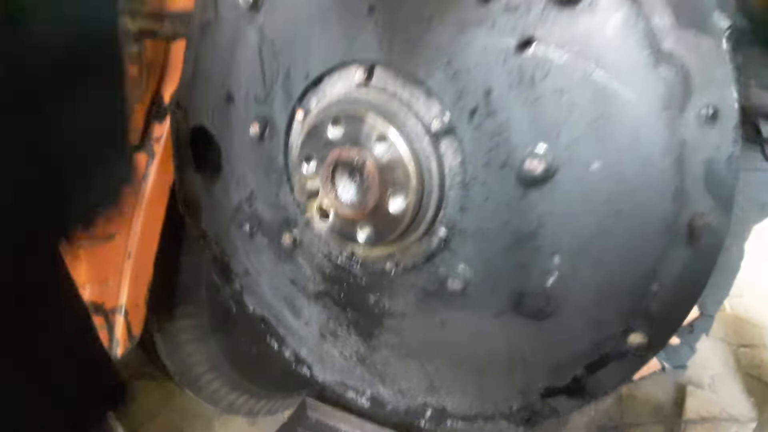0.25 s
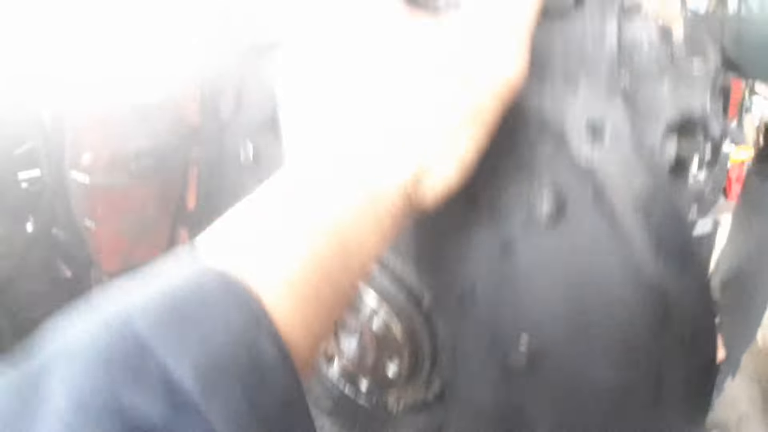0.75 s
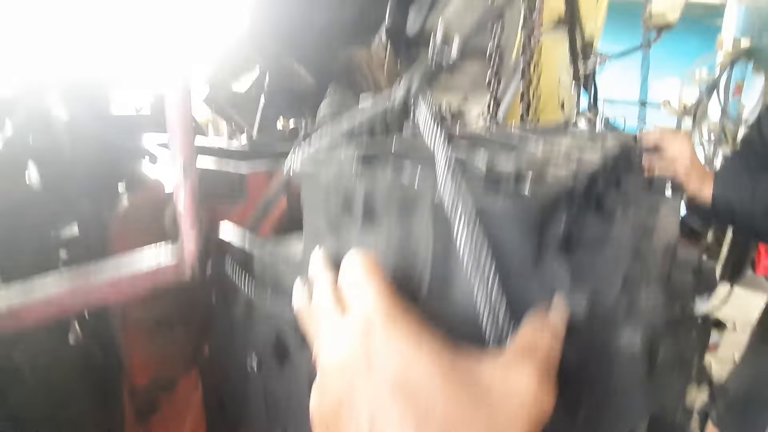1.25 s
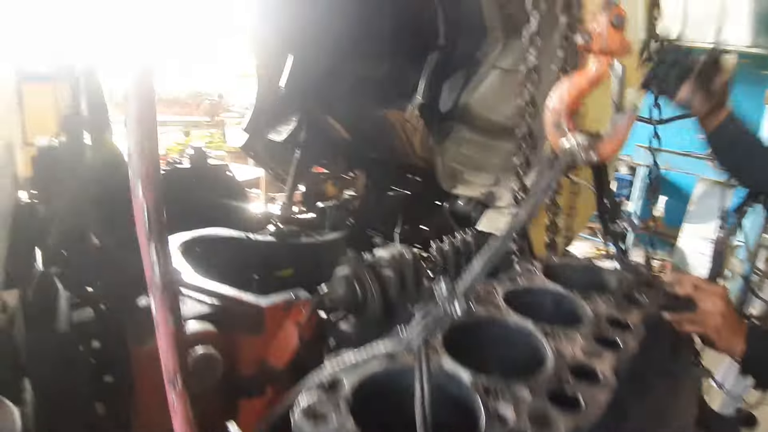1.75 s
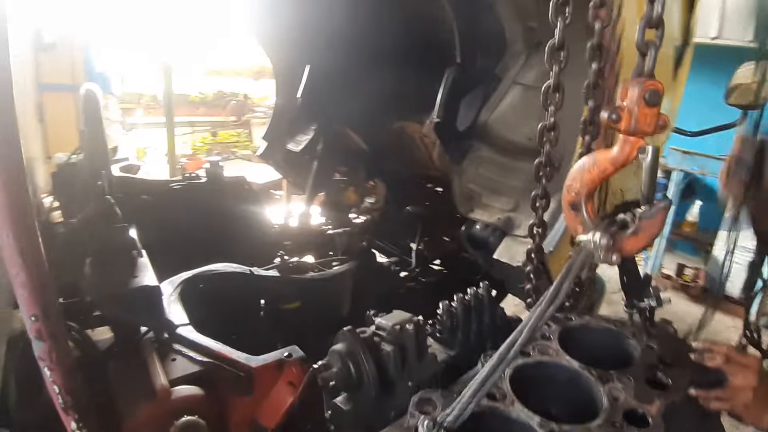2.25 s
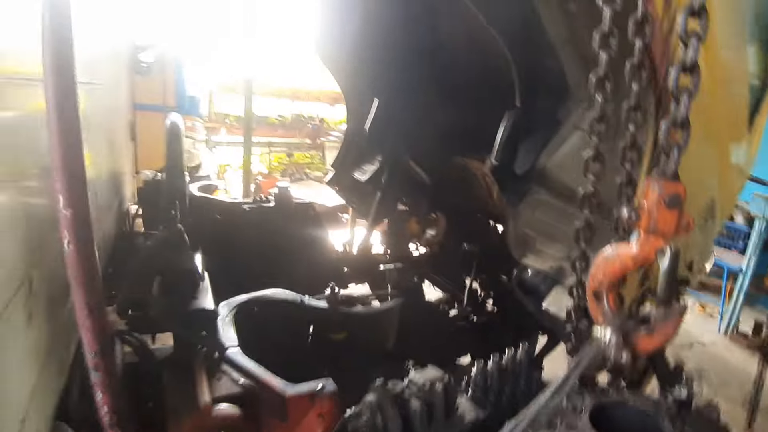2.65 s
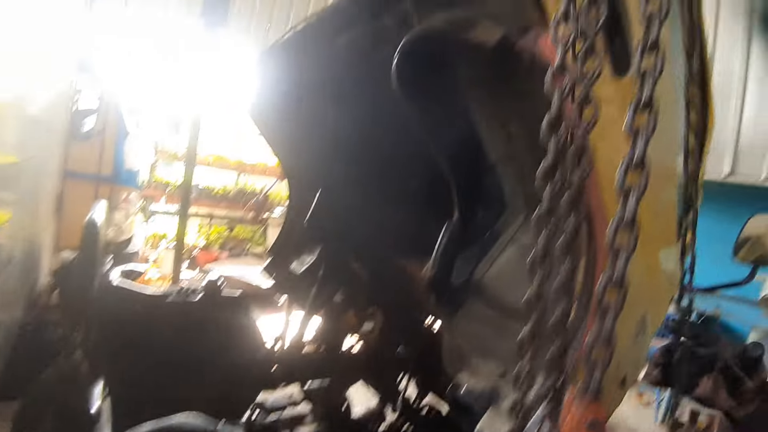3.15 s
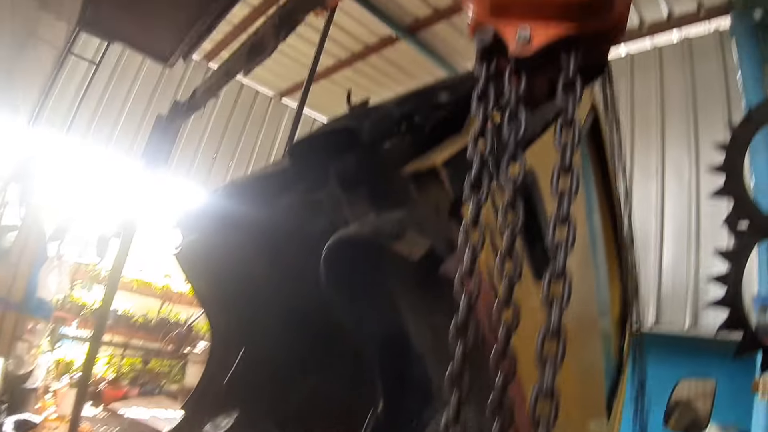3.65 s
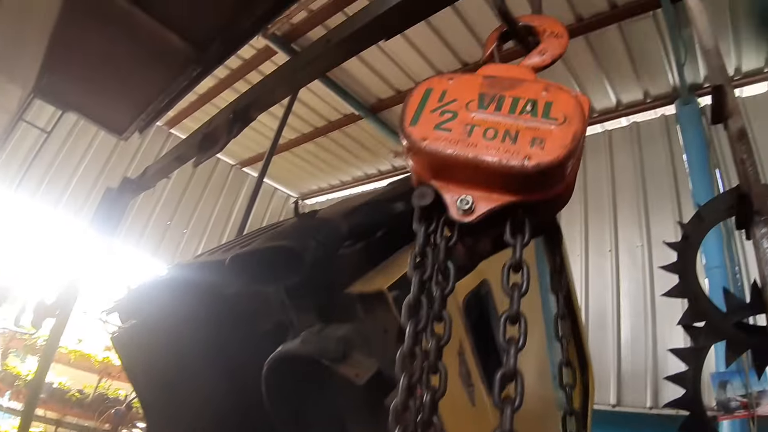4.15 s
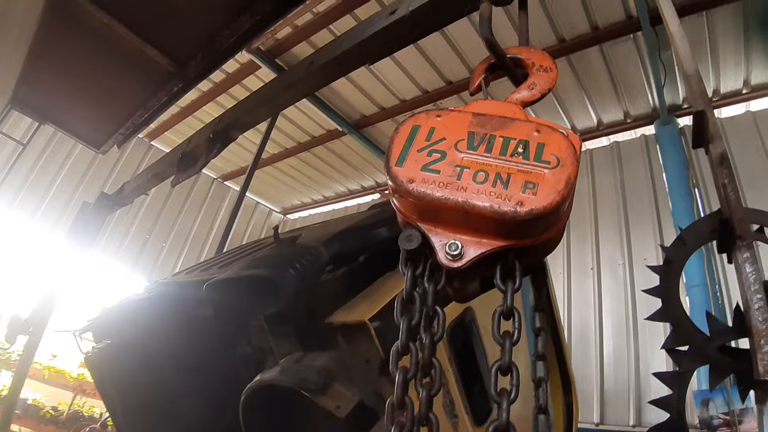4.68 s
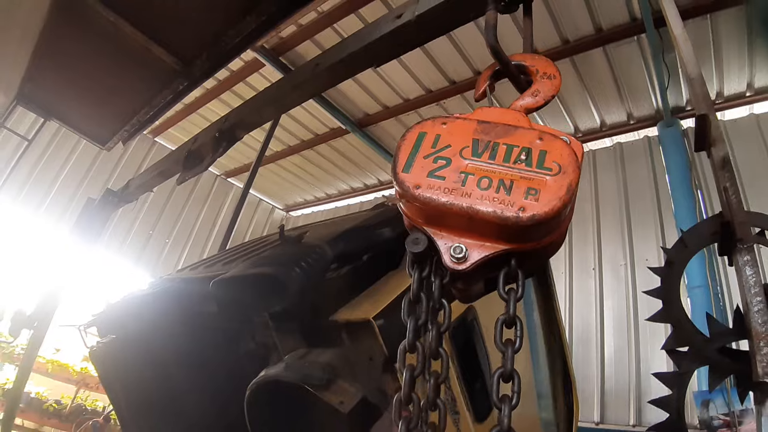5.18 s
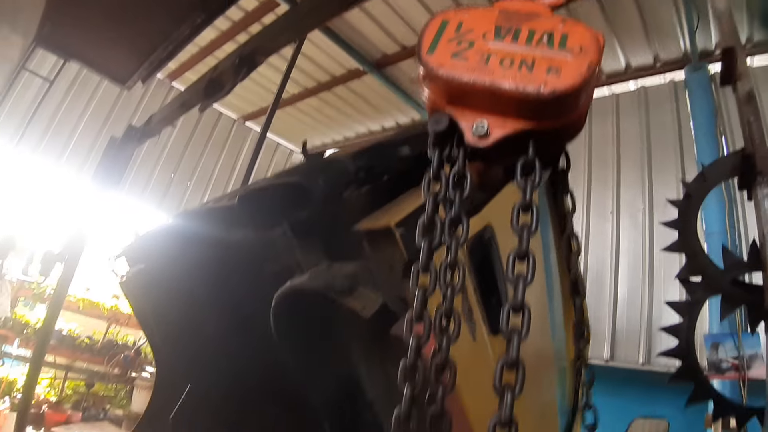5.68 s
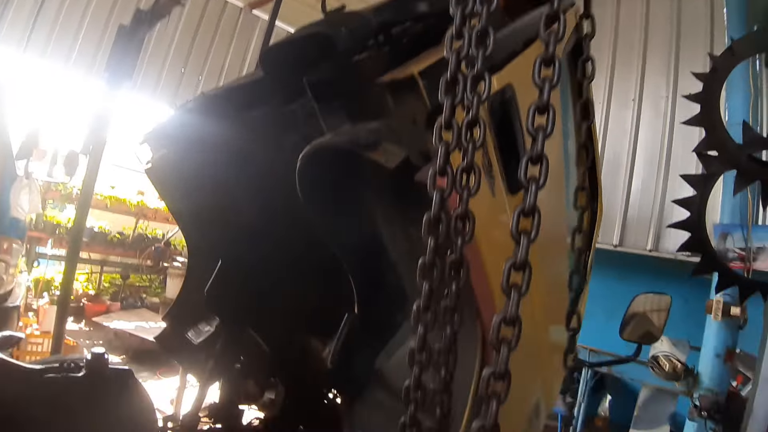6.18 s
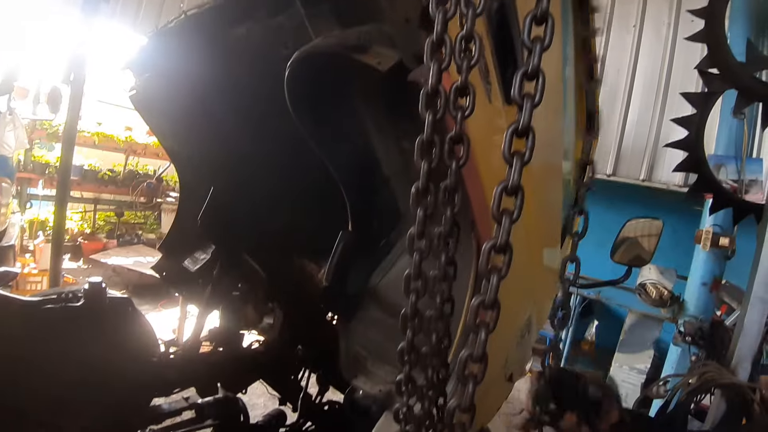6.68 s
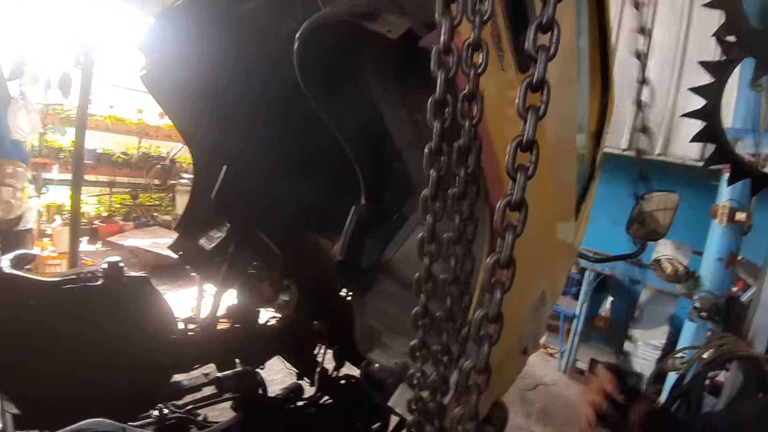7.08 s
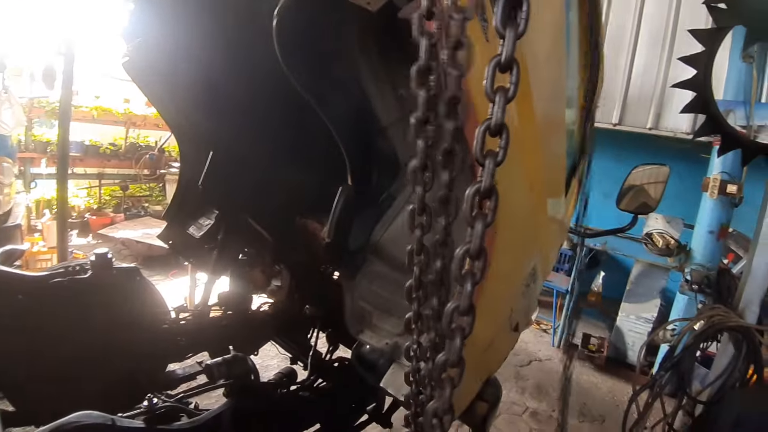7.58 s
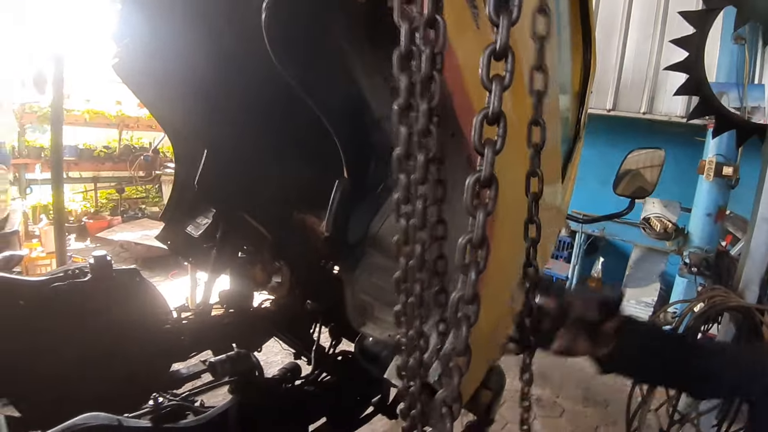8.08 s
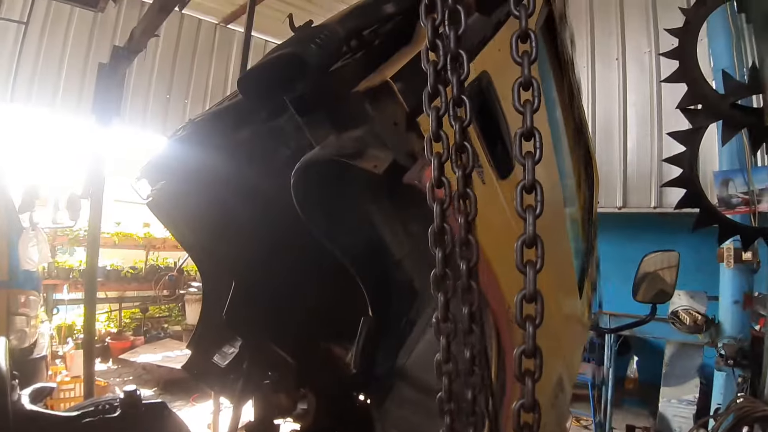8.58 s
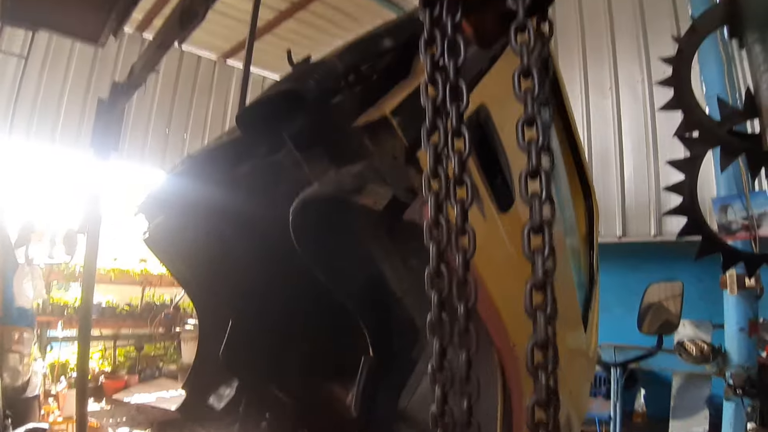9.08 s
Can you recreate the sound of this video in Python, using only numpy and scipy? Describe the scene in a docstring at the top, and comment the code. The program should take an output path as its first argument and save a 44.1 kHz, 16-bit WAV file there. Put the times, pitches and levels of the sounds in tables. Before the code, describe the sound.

A pull already under way fades out, then six more bursts of chain clatter follow with uneven pauses. Fast metallic links, sharp ratchet clicks and boxy cover knocks crowd together, sometimes thickening into a hoarse slap. Loose links tinkle in the gaps. Close stereo pickup favours the right; a bright, short metallic room echo and quiet shop rumble surround it.

```python
"""A sheet-metal workshop, where a hand chain hoist is worked in seven pulls, close by and to the right.
In each pull the wheel speeds up and slows down. Links clink, the pawl ticks, the housing knocks and the
slack chain rattles: each contact is a handful of fading sine waves plus a short burst of noise.
The cover clatters four times; loose links jingle, dry scuffs and two dull bumps are heard.
The room answers with fading noise, and the shop rumbles faintly as coloured noise."""
import sys
import numpy as np
from scipy import signal
from scipy.fft import rfft, irfft, next_fast_len
from scipy.io import wavfile
from scipy.ndimage import map_coordinates

SR = 44100
rng = np.random.default_rng(int(sys.argv[2]) if len(sys.argv) > 2 else 0)


def pcm_store(signal):
    """Save signal as 16-bit PCM."""
    levels = np.round(np.clip(np.atleast_2d(signal), -1, 1) * 32767)
    wavfile.write(sys.argv[1], SR, levels.astype(np.int16).T)


N = 411453  # length in samples


def amp(db):
    """Decibels to gain."""
    return 10 ** (np.asarray(db) / 20)


def unit(x):
    """Scale x to an rms of 1."""
    return x / np.sqrt(np.mean(x ** 2) + 1e-20)


def along(points, hz):
    """Read (pitch_hz, value) points at any pitch, on a log axis."""
    point_hz, values = np.transpose(points)
    return np.interp(np.log(hz + 1), np.log(point_hz + 1), values)


def curve(rows):
    """Turn (time_s, value) rows into one value per sample."""
    return np.interp(np.arange(N) / SR, *np.transpose(rows))


def filtered(x, response):
    """Multiply the spectrum of x by a gain that depends on frequency."""
    size = next_fast_len(N + SR // 2)
    spectrum = rfft(x, size) * response(np.fft.rfftfreq(size, 1 / SR))
    return irfft(spectrum, size)[..., :N]


def noise(colour):
    """Coloured noise of rms 1."""
    white = rng.standard_normal(N)
    return unit(filtered(white, lambda hz: amp(along(colour, hz))))


def decaying(times, sizes, t60, hz=0):
    """A damped oscillator kicked at the given times; at 0 Hz it is a plain fading level."""
    kicks = np.full(N, 1e-20, complex)
    places = np.clip(np.round(np.asarray(times) * SR).astype(int), 0, N - 1)
    np.add.at(kicks, places, sizes)
    pole = np.exp((2j * np.pi * hz - np.log(1000) / t60) / SR)
    return signal.lfilter([1], [1, -pole], kicks)


def ring(times, db, modes, scatter_db, detune, attack):
    """Each blow lands on another spot: it shares its energy among the modes anew, at slightly new pitches."""
    hz, level, t60 = np.transpose(modes)
    strength, pitch, phase = rng.standard_normal((len(times), 3, len(modes))).transpose(1, 0, 2)
    # Soft blows reach the high modes less.
    dulling_db = 0.072 * np.outer(db - db.max(), np.log2(hz / hz.mean()))
    sizes = amp(level + dulling_db + scatter_db * strength)
    sizes *= (amp(db) / np.linalg.norm(sizes, axis=1))[:, None]
    speed = 2 * np.pi * hz * (1 + detune * pitch)
    sizes, speed, phase = np.float32([sizes, speed, 2 * np.pi * phase])[..., None]
    t = np.arange(SR // 10, dtype=np.float32) / SR  # a ring lasts 0.1 s at most
    rings = np.zeros((len(times), len(t)), np.float32)
    for k, life in enumerate(t60):
        u = t[t < life]
        fade = np.float32(np.exp(-np.log(1000) * u / life))
        rings[:, :len(u)] += sizes[:, k] * np.sin(speed[:, k] * u + phase[:, k]) * fade
    rings *= 1 - np.exp(-t / attack)
    where = np.round(np.maximum(times, 0) * SR).astype(int)[:, None] + np.arange(len(t))
    return np.bincount(where.ravel(), rings.ravel(), N)[:N]


def crack(times, db, colour, t60, attack):
    """A short burst of noise at every contact, building up as the parts chatter."""
    fading = decaying(times, amp(db) ** 2, t60 / 2).real
    not_yet_built = decaying(times, amp(db) ** 2, attack * np.log(1000)).real
    return np.sqrt(np.abs(fading - not_yet_built)) * noise(colour)


def blows(*groups):
    """Join groups of ((times, levels), gain dB) into one list, leaving out any before time 0."""
    times = np.concatenate([group[0] for group, _ in groups])
    db = np.concatenate([group[1] + gain for group, gain in groups])
    return times[times > 0], db[times > 0]


# Pulls on the hand chain; the first is already under way. Levels are relative, before each layer's own gain.
# A lean makes the late part of a pull louder (+) or softer (-).
# Columns: start_s, fastest_s, end_s, top_speed_links_per_s, clinks_db, knocks_db, pawl_db, slack_chain_db,
# chain_lean_db_per_s, knock_lean_db_per_s
PULLS = [(-.453, -0.151, .32, 33, -9.5, -22.5, -14.5, -14, -32.5, -12.5),
         (0.746, 1.139, 1.575, 43.34, -16, -28.5, -20, -13.5, -5, 13.5),
         (2.123, 2.57, 2.832, 46.59, -13, -19.5, -15, -10.5, -10.5, -3.5),
         (3.431, 3.895, 4.088, 44.78, -11, -20.5, -8.5, -19, -12.5, -18),
         (4.932, 5.288, 5.623, 48.21, -13.5, -19.5, -7.5, -28.5, 1, -8.5),
         (7.116, 7.489, 7.88, 47.69, -16, -23, -17, -12, -13.5, -12),
         (8.261, 8.31, 8.877, 51.87, -6.5, -21.5, -18, -12.5, -19, -8.5)]
LINK_SCATTER_DB = 2.73  # no two links land alike


def passing(lag, grows_db, scatter_db, columns):
    """One contact (s, dB) per link: in each pull the wheel speeds up and slows down along quarter sines.
    Lag is a share of a link's travel, grows_db the gain per tenfold speed; columns picks level and lean."""
    times, db = [], []
    for pull in np.array(PULLS):
        start, fastest, end, top = pull[:4]
        level, lean = pull[list(columns)]
        t = np.linspace(start, end, num=1000)
        pace = np.sin(np.pi * np.interp(t, [start, fastest, end], [0, .5, 1]))
        travel = np.cumsum(top * pace) * (t[1] - t[0])  # in links
        at = np.interp(np.arange(.5 + lag, travel[-1]), travel, t)
        landing = rng.standard_normal(64)[:len(at)]
        # Faster links hit harder.
        speed_db = grows_db * np.log10(np.interp(at, t, pace) + 1e-6)
        times.append(at)
        db.append(level + lean * (at - fastest) + speed_db + scatter_db * landing)
    return np.concatenate(times), np.concatenate(db)


# Single links that snap taut in a pull, or swing against the hoist between pulls; also used by the
# chain and the housing. Levels are relative. Columns: time_s, clink_db, knock_db
SINGLE_LINKS = [(0.7918, -24.5, -46), (0.8406, -18.5, -38), (1.1556, -13, -22), (1.204, -18.5, -25),
                (1.2525, -14.5, -21.5), (1.432, -20.5, -43.5), (2.1734, -26.5, -46), (2.2143, -16.5, -54),
                (2.335, -16.5, -21.5), (2.3644, -13.5, -21), (2.7205, -8, -21.5), (3.4519, -33.5, -47.5),
                (3.4986, -22, -29), (3.5485, -15, -33), (3.6148, -6, -20.5), (3.683, -6.5, -15.5),
                (3.998, -8.5, -19), (4.087, -19.5, -22.5), (4.508, -38.5, -43), (4.77, -46, -42.5),
                (4.8447, -28.5, -37), (4.9634, -33, -47.5), (4.986, -35, -31.5), (5.0495, -13.5, -21.5),
                (5.12, -12.5, -16.5), (5.1455, -12.5, -19), (5.4944, -15, -34.5), (5.542, -14, -20.5),
                (5.62, -22.5, -29.5), (5.847, -31, -43), (5.8915, -30.5, -48), (5.975, -40, -45),
                (6.783, -44.5, -65.5), (7.1345, -23.5, -45.5), (7.1831, -18, -47.5), (7.2778, -10.5, -19.5),
                (7.3372, -13.5, -19), (7.3617, -10, -17.5), (7.703, -11, -39.5), (7.7156, -20.5, -19),
                (8.1462, -31.5, -47), (8.2893, -12, -24.5), (8.3039, -9.5, -22), (8.507, -6.5, -19),
                (8.6729, -20.5, -23), (8.6944, -12.5, -37.5), (8.7363, -18.5, -42.5), (8.773, -22.5, -27.5),
                (9.2913, -42, -45.5)]


def ordinary(links):
    """The passing links (s, dB), less those within 13 ms of a single link."""
    times, db = links
    apart = np.abs(times[:, None] - np.transpose(SINGLE_LINKS)[0]).min(axis=1) > .013
    return times[apart], db[apart]


def grazes(links):
    """A link grazes the wheel up to 5 ms before it seats, 15 dB softer."""
    times, db = links
    return times - 0.005 * rng.uniform(.5, 1, 256)[:len(times)], db - 15


def rattle(links, count):
    """Each passing link shakes the chain: small contacts (s, dB) follow it, ever rarer and fainter."""
    settle_s, settle_db_per_s = 0.34, 96.5
    times, db = links
    chance = rng.random((256, count))[:len(times)]
    delay = settle_s * ((np.arange(count) + chance) / count) ** 2
    return (times[:, None] + delay).ravel(), (db[:, None] - settle_db_per_s * delay).ravel()


def wheel_ring(times, db):
    """Every chain contact feeds the hand wheel's one long note, which rings on after the links."""
    kicks = amp(db - 34) * np.exp(2j * np.pi * rng.random(len(times)))
    return decaying(times, kicks, t60=0.76, hz=4290).imag


# Ringing modes of the chain and wheel. Columns: pitch_hz, relative_level_db, t60_s
STEEL = [(3894, -4.5, 0.031), (4162, -4, 0.038), (4264, -1.5, 0.044), (4834, -10, 0.035), (5158, 2, 0.031),
         (6136, -2, 0.026), (7290, -17, 0.058), (8320, -12.5, 0.041), (8690, -13, 0.069), (9000, -3, 0.026),
         (10720, -8, 0.022), (12970, -15.5, 0.044), (15200, -32, .04)]
# Colour of the noise when steel parts touch, also used by the pawl. Columns: pitch_hz, relative_level_db
STEEL_CRACK = [(150, -31), (1500, -10), (2800, -13.5), (3450, -9.5), (3950, 9.5), (4700, 1), (5700, -3),
               (6900, -10.5), (8800, -2), (9800, -13), (12000, -8.5), (13300, -18), (14000, -12.5),
               (16000, -23.5)]


def chain():
    """Links clink onto the wheel and off it, with a finer rattle from the slack chain between them."""
    single_db, seating_db, leaving_db, graze_db, rattle_db = 0.5, 1.5, -3, -3.5, -6
    clink_grows_db, rattle_grows_db = 36, 23.5  # per tenfold speed
    leave_lag = 0.52  # share of a link's travel until another link leaves the wheel
    single = np.transpose(SINGLE_LINKS)[:2]
    seating = ordinary(passing(0, clink_grows_db, LINK_SCATTER_DB, columns=(4, 8)))
    leaving = ordinary(passing(leave_lag, clink_grows_db, LINK_SCATTER_DB, columns=(4, 8)))
    slack = rattle(passing(0, rattle_grows_db, LINK_SCATTER_DB, columns=(7, 8)), count=12)
    times, db = blows((single, single_db), (seating, seating_db), (leaving, leaving_db),
                      (grazes(single), graze_db), (slack, rattle_db))
    crack_db = db + 0.084 * (db - db.max())  # gentle touches ring purer than hard ones
    links = amp(6) * ring(times, db, STEEL, scatter_db=5.5, detune=0.0099, attack=0.0017)
    contact = crack(times, crack_db, STEEL_CRACK, t60=0.033, attack=0.0006)
    return links + contact + wheel_ring(times, db)


# Ringing modes of the pawl. Columns: pitch_hz, relative_level_db, t60_s
PAWL = [(4267, -6.5, 0.05), (5108, -3, 0.034), (6130, 0.5, 0.023), (8040, -3, 0.016), (8970, -2, 0.023),
        (10730, -1, 0.027), (13050, -20.5, 0.027)]


def pawl():
    """The sprung pawl drops once per link and rings in its own clear modes."""
    tick_lag = 0.56  # share of a link's travel after it seats
    ticks = passing(tick_lag, grows_db=27, scatter_db=0.5, columns=(6, 8))
    times, db = blows((ticks, 0))
    ringing = amp(5.0) * ring(times, db, PAWL, scatter_db=6, detune=0.0067, attack=0.0006)
    return ringing + amp(-5.5) * crack(times, db, STEEL_CRACK, t60=.018, attack=.0002)


# Ringing modes of the housing. Columns: pitch_hz, relative_level_db, t60_s
HOUSING = [(643.6, -10, 0.095), (695, -2.5, 0.058), (789, -0.5, 0.051), (855.7, 1, 0.05),
           (927, -2.5, 0.041), (1021, -8, 0.022), (1250, -4.5, 0.03), (1440, -5, 0.037),
           (1504, -0.5, 0.072), (1670, -23, 0.028), (1860, -15.5, 0.044), (1915, -3, 0.099),
           (2050, -8, 0.05), (2205, -6, 0.12), (2434, -9, 0.076), (4010, -11, 0.066)]
# Colour of the noise when the housing is knocked. Columns: pitch_hz, relative_level_db
HOUSING_CRACK = [(30, -38), (150, -11.5), (330, -20), (520, -31), (720, -5), (1150, -7), (1500, -6),
                 (2400, -5), (2800, -13), (6000, -17)]


def housing():
    """Links knock on the wheel, the shaken chain clatters after them, and the hollow cover answers."""
    single_db, seating_db, graze_db, clatter_db = 0.5, -1.0, -0.5, -7.5
    knock_grows_db, clatter_grows_db = 31.5, 20.5  # per tenfold speed
    single = np.transpose(SINGLE_LINKS)[[0, 2]]
    seating = ordinary(passing(0, knock_grows_db, LINK_SCATTER_DB, columns=(5, 9)))
    clatter = rattle(passing(0, clatter_grows_db, LINK_SCATTER_DB, columns=(5, 9)), count=8)
    times, db = blows((single, single_db), (seating, seating_db), (grazes(single), graze_db),
                      (clatter, clatter_db))
    hollow = amp(6) * ring(times, db, HOUSING, scatter_db=3.5, detune=0.005, attack=0.0016)
    return hollow + amp(1.0) * crack(times, db, HOUSING_CRACK, t60=0.059, attack=0.0026)


# Near full speed the chain slaps the cover's sheet. Columns: middle_s, half_length_s, relative_level_db
SLAPS = [(1.193, 0.078, -28), (5.333, 0.05, -13), (7.424, 0.04, -22), (8.434, 0.052, -16.5)]


def slaps():
    """Twelve quick hits per slap make a thick, hoarse clatter in the cover's resonances."""
    place = np.linspace(-1, 1, num=12)
    times = np.concatenate([middle + half * place for middle, half, _ in SLAPS])
    times = times + 0.0025 * rng.standard_normal(len(times))
    db = np.concatenate([level - 8 * place ** 2 for _, _, level in SLAPS])
    # Columns: pitch_hz, relative_level_db, t60_s
    cover = [(857, 3, .03), (1340, 1, 0.033), (1410, 2.5, 0.0072), (1700, 1.0, 0.036), (2080, -3, .03)]
    return amp(9.5) * ring(times, db, cover, scatter_db=3, detune=.05, attack=.001)


# Loose links touching. Columns: time_s, relative_level_db
JINGLES = [(0.2179, -25.5), (1.587, -24), (1.827, -33), (2.8807, -23), (2.9416, -29), (4.2281, -28.5),
           (5.641, -26.5), (5.674, -30), (7.8758, -29.5), (8.8578, -32)]
# Ringing modes of a loose link. Columns: pitch_hz, relative_level_db, t60_s
LOOSE = [(4440, -3, 0.079), (7460, -10, 0.055), (7900, 1.5, 0.052), (8400, -4, 0.048), (9100, 0.5, 0.052),
         (10600, -3, 0.043), (11750, -14, 0.051), (12900, -36, .04)]


def loose_links():
    """Unloaded links ring higher and fainter, with a little scuffing noise."""
    times, db = np.transpose(JINGLES)
    links = ring(times, db, LOOSE, scatter_db=2.5, detune=.02, attack=.001)
    contact = crack(times, db, SCUFF_COLOUR, t60=0.19, attack=.001)
    return amp(1.0) * links + amp(-8.5) * contact


# The microphone's aim changes how much of the top octave it hears. Columns: time_s, gain_db
FACING = [(0, 0.5), (1.2, 2.5), (2.6, -1), (3.8, -1.5), (5.3, -3), (7.4, -1), (8.4, 0.5), (9.3, -7.5)]


def facing(x):
    """The microphone's aim raises or lowers the treble above about 11 kHz."""
    top = filtered(x, lambda hz: 1 / (1 + (11000 / (hz + 1)) ** 12))
    return x + (amp(curve(FACING)) - 1) * top


# Small dry scuffs of handling. Columns: time_s, level_db
SCUFFS = [(0.401, -42), (0.4617, -38), (0.552, -37.5), (3.1266, -48), (3.2134, -42.5), (4.4525, -45),
          (6.352, -41.5), (6.559, -44.5), (6.638, -50.5), (8.0423, -48), (9.0078, -38)]
# Colour of the scuffing noise, also used by the loose links. Columns: pitch_hz, relative_level_db
SCUFF_COLOUR = [(500, -6.5), (2500, -4.5), (6000, -4.5), (11000, -1.5), (16000, -11.5)]


def scuffs():
    """Dry little rubs with no pitch: noise that starts at once and fades."""
    times, db = np.transpose(SCUFFS)
    return decaying(times, amp(db), t60=0.09).real * noise(SCUFF_COLOUR)


# Two dull bumps. Columns: time_s, level_db, pitch_hz, t60_s
BUMPS = [(3.879, -20.5, 85.6, 0.076), (8.111, -32, 204.5, .05)]


def bumps():
    """Each bump is a low, quickly damped tone with a soft click of noise."""
    push = sum(decaying([s], amp(db), t60, hz).imag for s, db, hz, t60 in BUMPS)
    times, db = np.transpose(BUMPS)[:2]
    # Columns: pitch_hz, relative_level_db
    click_colour = [(30, -9.5), (150, 9), (400, -1), (700, -19.0), (2500, -11), (5000, -33.5)]
    return push + amp(-2.0) * crack(times, db, click_colour, t60=0.073, attack=.0003)


# How long the room's echo lasts at each pitch. Columns: pitch_hz, t60_s
WALLS = [(150, 0.16), (800, 0.29), (4000, 0.7), (9000, 0.86), (15000, 0.04)]


def room(x):
    """The workshop's diffuse answer: fading noise, different at each microphone."""
    hz, t, grains = signal.stft(rng.standard_normal((2, SR)), SR, nperseg=256)
    early = 1 + 3.4 * np.exp(-t / 0.022)  # nearby machinery answers first
    fade = np.exp(-np.log(1000) * t / along(WALLS, hz)[:, None])
    tail = signal.istft(grains * early * fade, SR, nperseg=256)[1]
    tail = np.pad(tail / np.linalg.norm(tail[0]), ((0, 0), (SR // 250, 0)))  # starts 4 ms late
    return signal.fftconvolve(x[None], tail, axes=1)[:, :N]


# Colour of the shop's rumble. Columns: pitch_hz, relative_level_db
SHOP = [(20, -32), (40, -14), (62, -5), (95, 0), (130, -0.5), (200, -6.5), (320, -11), (520, -13),
        (800, -12.5), (1250, -19.5), (2000, -19.5), (3200, -28), (5000, -30), (10000, -39.5), (16000, -34)]
# How alike the rumble is on the left and right. Columns: pitch_hz, likeness (1 = the same)
ALIKE = [(60, 1), (240, 0.95), (950, 0.14), (3800, .02)]
# Loudness of the rumble over time. Columns: time_s, relative_level_db
SHOP_LEVEL = [(0, -47.5), (3.6, -48.5), (4.4, -53), (6.2, -52), (7.9, -49.5), (9.3, -51)]


def shop():
    """A faint background rumble that slowly swells and sinks, nearly mono in the bass."""
    turn = lambda hz: np.arccos(np.clip(along(ALIKE, hz), 0, 1)) / 2
    mid = filtered(noise(SHOP), lambda hz: np.cos(turn(hz)))
    side = filtered(noise(SHOP), lambda hz: np.sin(turn(hz)))
    balance = amp([[-1], [.5]])  # left, right
    return np.array([mid + side, mid - side]) * balance * amp(curve(SHOP_LEVEL))


# The extra delay of the path to the left microphone drifts. Columns: time_s, delay_s
LAG = [(0, 0.000078), (1.6, 0.00013), (3.8, 0.0002), (5.2, 0.00014), (7.3, 0.00015), (8.5, 0.00012)]
# The left microphone faces away from the hoist. Columns: pitch_hz, gain_db
SHADOW = [(100, -16.5), (450, -0.5), (750, 4.5), (1000, 3), (1400, -6.5), (2300, -9), (3200, -3),
          (4200, -13.5), (6100, -13), (7200, -15), (8800, -34), (10700, -13.5), (13300, 1.5), (15200, 4)]


def scene():
    """The hoist reaches the left microphone late and shadowed, so that side hears more of the room."""
    hoist = facing(pawl() + chain() + housing() + slaps() + loose_links())
    direct = hoist + scuffs() + bumps()
    wet_left, wet_right = amp(-9.0) * room(direct)
    # Contacts come from different points along the chain, so the delay also wavers.
    spots = np.arange(0, N / SR, 1 / 50)
    waver = curve(np.c_[spots, .000024 * rng.standard_normal(len(spots))])
    lag = curve(LAG) + waver
    late = map_coordinates(direct, [np.arange(N) - lag * SR])
    left = filtered(amp(-4.0) * late + amp(1) * wet_left, lambda hz: amp(along(SHADOW, hz)))
    return np.array([left, direct + wet_right]) + shop()


def record(dry):
    """Peaks round off towards full scale, and then everything above 15900 Hz is cut."""
    rounded = dry / (1 + np.abs(dry) ** 6) ** (1 / 6)
    return filtered(rounded, lambda hz: hz < 15900)


dry = scene()
out = record(dry)
pcm_store(out)
```